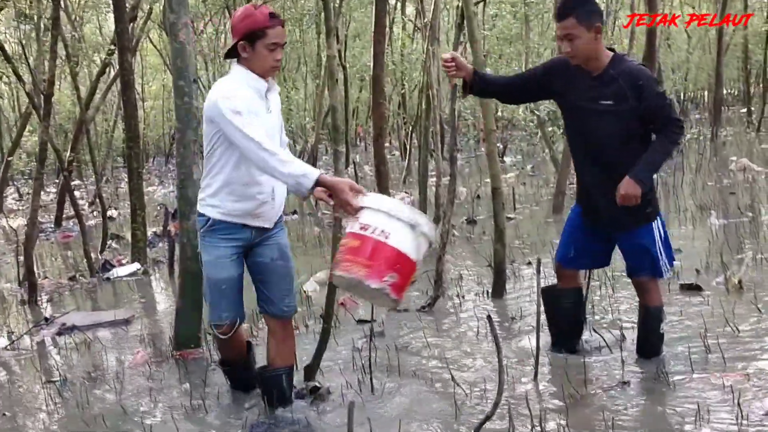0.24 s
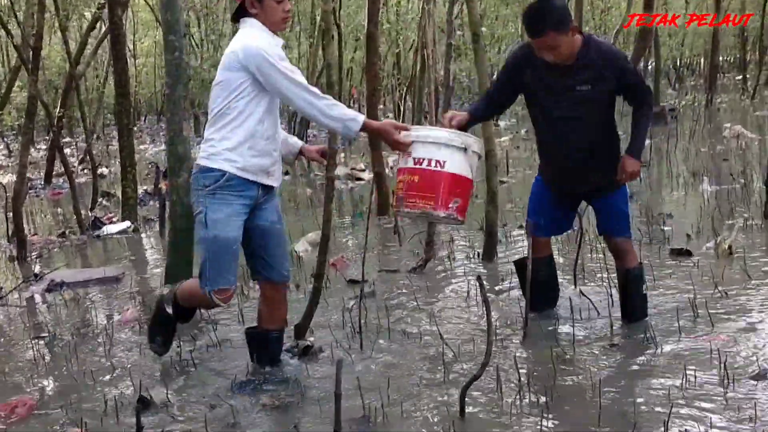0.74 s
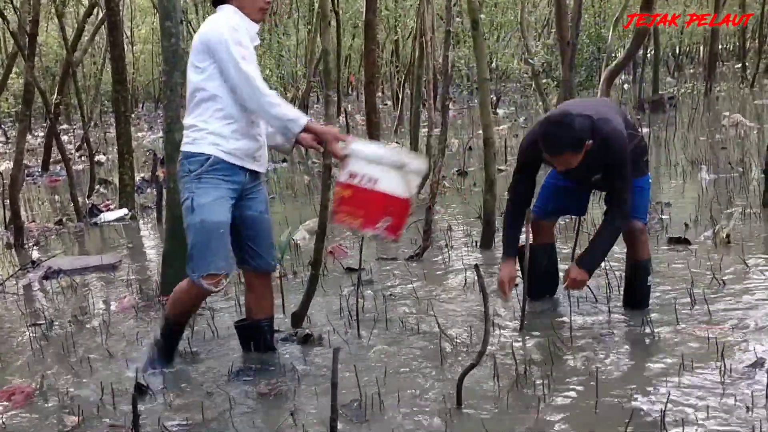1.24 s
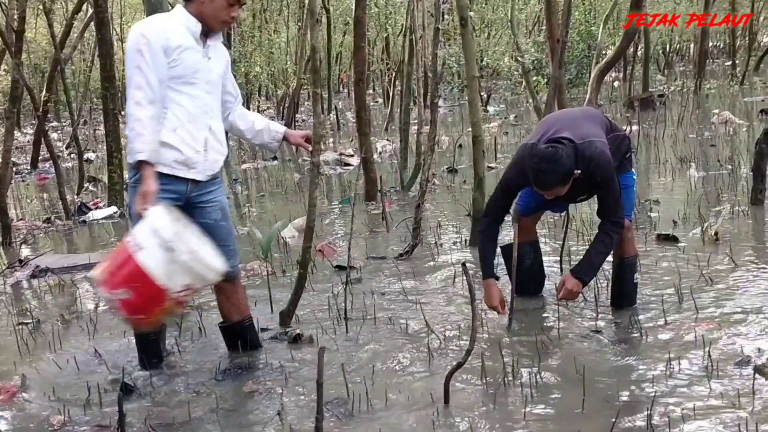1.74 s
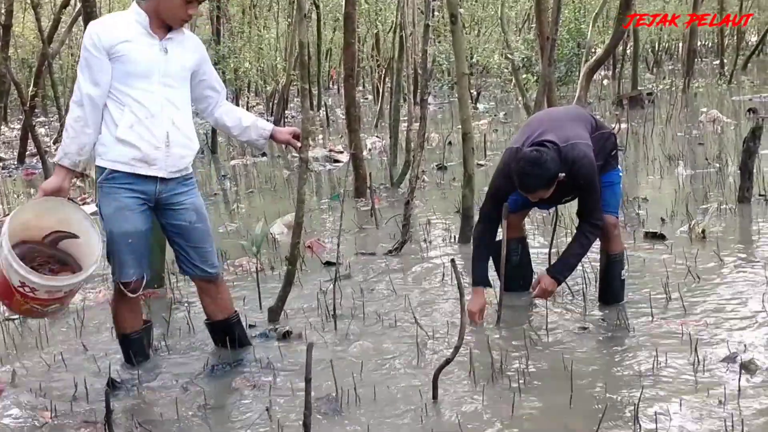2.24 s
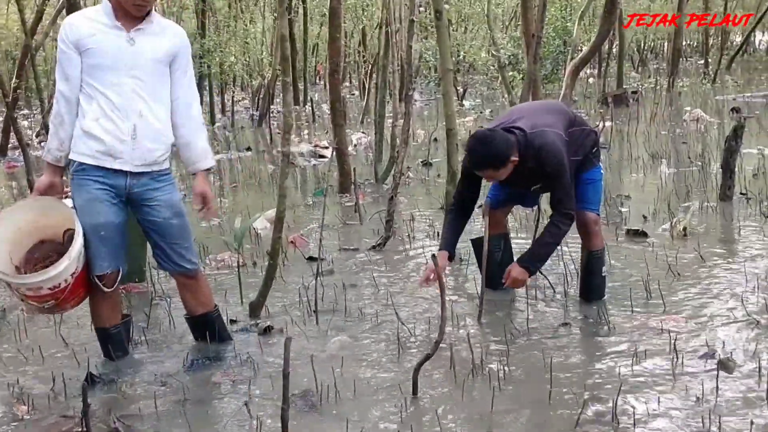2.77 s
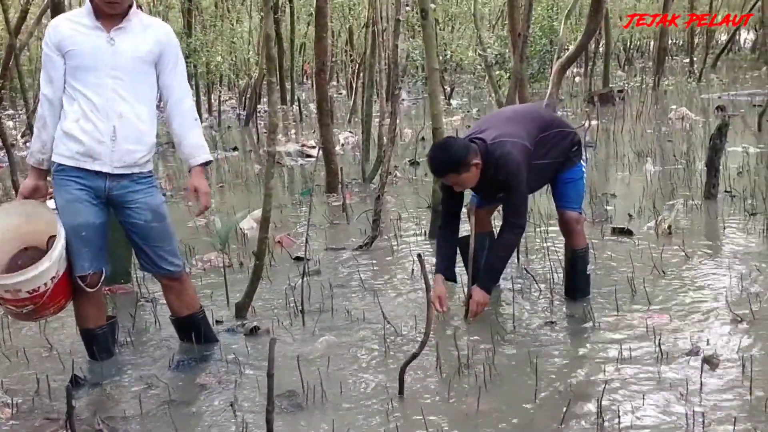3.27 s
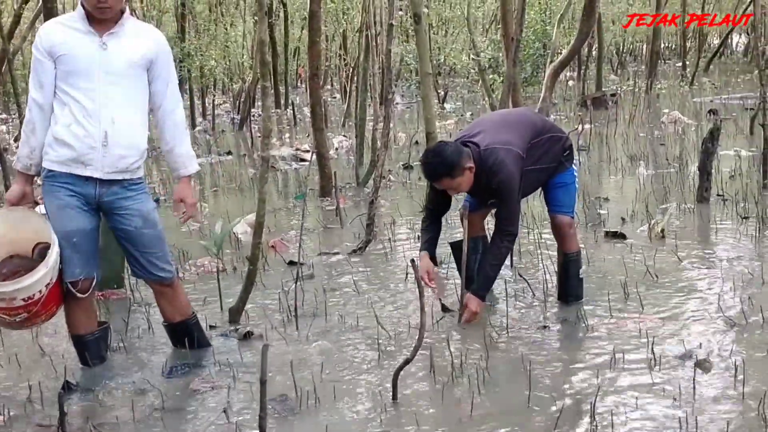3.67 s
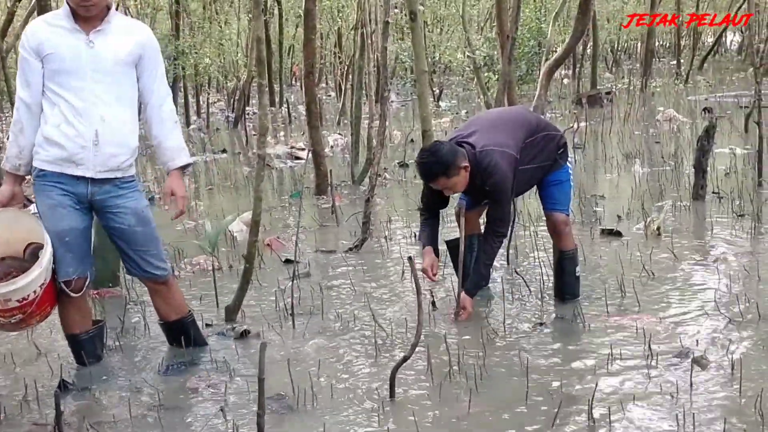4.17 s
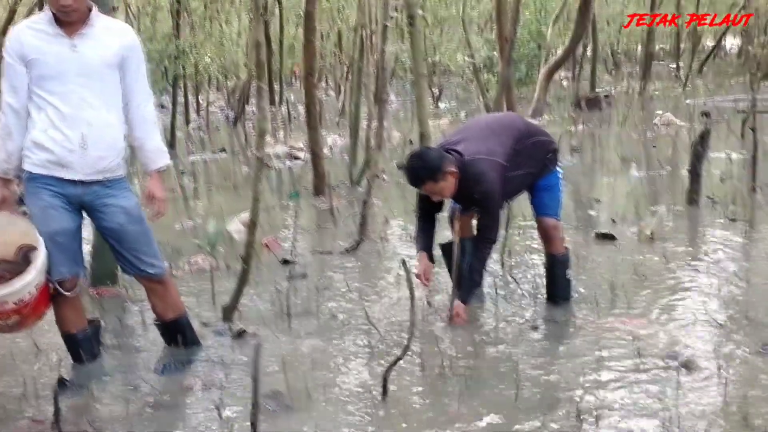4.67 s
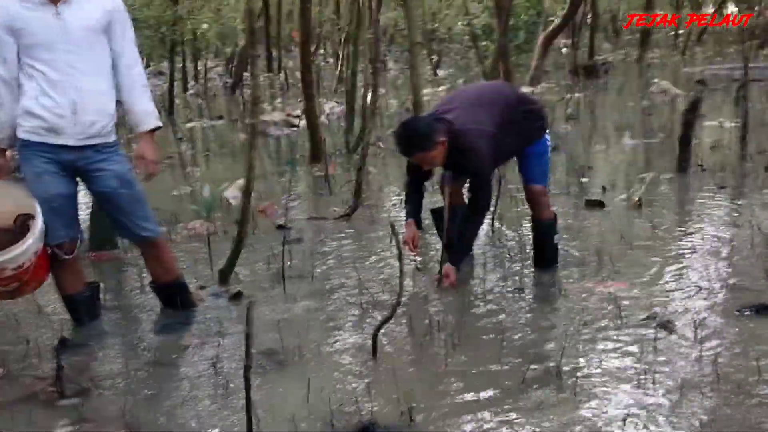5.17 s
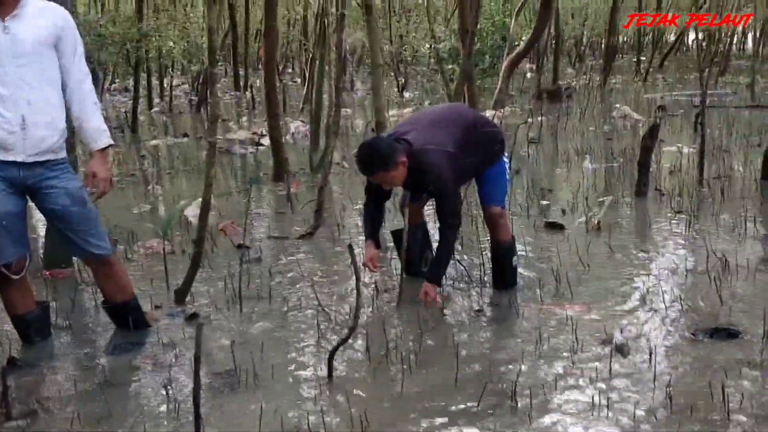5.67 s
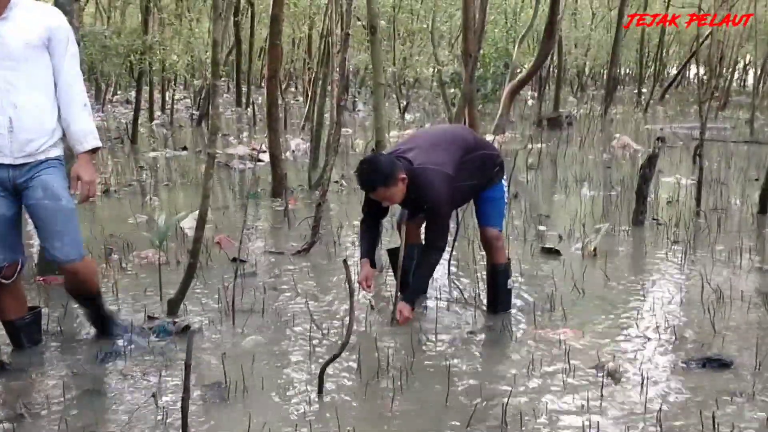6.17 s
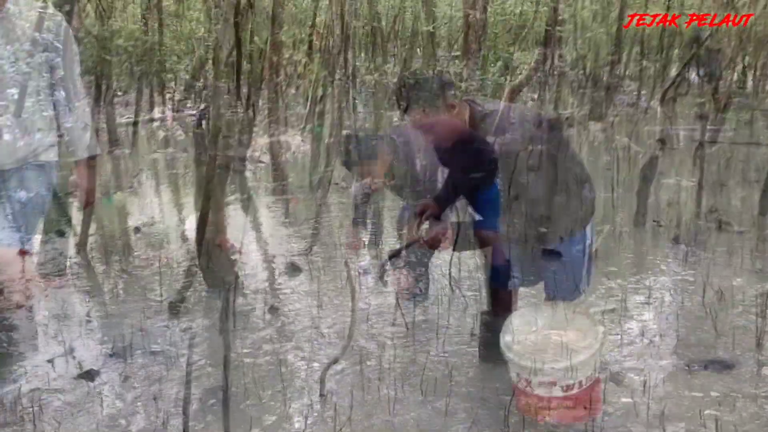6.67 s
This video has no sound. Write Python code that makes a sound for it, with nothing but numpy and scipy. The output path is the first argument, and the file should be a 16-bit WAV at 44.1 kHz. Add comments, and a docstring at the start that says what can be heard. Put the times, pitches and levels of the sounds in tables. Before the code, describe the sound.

Throbbing cicadas and two distant birds fill a mangrove swamp, with nearby splashes, muddy plops and a single bucket handle clack.

```python
"""A small bird repeats a falling, whistled chirp in a mangrove swamp; a second answers with nasal
notes, level and rising. Cicadas buzz with their tymbals and throb over distant insect trills.
Boots slosh in shallow water and hands dabble in mud: ringing bubbles, spray and drips.
A plastic bucket's handle clacks once. Trunks scatter the sound; a low, distant rumble
and the hush of the forest lie underneath."""
import sys
import numpy as np
from scipy import signal
from scipy.fft import rfft, irfft
from scipy.io import wavfile

SR = 44100
rng = np.random.default_rng(int(sys.argv[2]) if len(sys.argv) > 2 else 0)


def int16_out(signal):
    """Quantize to a 16-bit WAV file."""
    q = np.round(np.clip(np.atleast_2d(signal).T, -1, 1) * 32767)
    wavfile.write(sys.argv[1], SR, q.astype(np.int16))


N = 305172
TIME = np.arange(N) / SR


# Shape of one chirp: progress (0-1), pitch_ratio, gain_db
CHIRP_SHAPE = [(0, 1, -3), (.15, .985, 0), (.45, .945, -1), (.65, .89, -4), (.85, .805, -4.5),
               (1, .74, -11)]
# Falling chirps: start_s, length_s, pitch_hz, level_db
FALLING_CHIRPS = [(.242, .085, 3170, -51), (.452, 0.084, 3360, -50.5), (.715, .08, 3360, -51),
                  (.948, 0.097, 3346, -49.5), (1.22, 0.11, 3295, -50), (1.485, .13, 3250, -50),
                  (1.862, 0.093, 3286, -54.5), (2.168, 0.081, 3296, -56.5), (2.485, .1, 3270, -55),
                  (2.788, 0.08, 3240, -57), (3.09, 0.082, 3254, -55.5), (3.248, 0.069, 3200, -52),
                  (3.46, 0.083, 3354, -51), (3.698, 0.097, 3354, -50), (3.96, .098, 3285, -50),
                  (4.255, 0.087, 3220, -49), (4.52, 0.12, 3200, -49.5), (4.94, 0.083, 2654, -57),
                  (5.245, 0.076, 2640, -54.5), (5.555, 0.077, 2583, -58), (6.65, 0.085, 3166, -58)]

def chirp(length_s, pitch_hz, level_db, waver=.0115, rasp=.017, under_db=-11, break_db=4.5):
    """A whistle sags, plunges and breaks up; the other side of the syrinx adds a fainter, lower tone."""
    n = int(length_s * SR)
    progress = np.linspace(0, 1, n) ** 1.3  # delays the fall
    knots, pitch_ratio, gain_db = np.transpose(CHIRP_SHAPE)
    jitter = 1 + waver * wander(n, 80) + rasp * progress * wander(n, 300)
    track_hz = pitch_hz * np.interp(progress, knots, pitch_ratio) * jitter
    phase = 2 * np.pi * np.cumsum(track_hz) / SR
    tone = np.sin(phase) + amp(under_db) * np.sin(.78 * phase) + amp(-25) * np.sin(2 * phase)
    hoarse = amp(-4) * progress * band(rng.standard_normal(n), 2350, 760)
    flicker_db = break_db * np.sqrt(progress) * wander(n, 74)
    effort_db = level_db + np.interp(progress, knots, gain_db) + flicker_db
    return amp(effort_db) * (unit(tone) + hoarse) * signal.windows.tukey(n, .16)


# Second bird's hoarseness: freq_hz, gain_db
RASP_SPECTRUM = [(900, -41), (1500, -7.5), (2100, -3.5), (2700, -6), (3400, -2.5), (4000, -19),
                 (4450, -1.5), (5200, -25.5)]

def nasal_note(length_s, pitch_hz, glide, rough, level_db, jitter=.0586):
    """Glides up toward pitch_hz, second harmonic strongest; rough (0-1) adds jitter and rasp."""
    n = int(length_s * SR)
    slide = 1 - glide * np.exp(-np.linspace(0, 1, n) / .25)
    track_hz = pitch_hz * slide * (1 + jitter * rough * wander(n, 293))
    phase = 2 * np.pi * np.cumsum(track_hz) / SR
    tone = amp(-5) * np.sin(phase) + np.sin(2 * phase) + amp(-15) * np.sin(3 * phase)
    rasp = amp(1) * 2 * rough ** 2 * colour(rng.standard_normal(n), RASP_SPECTRUM)
    return amp(level_db) * unit(unit(tone) + rasp) * signal.windows.tukey(n, .45)


# Second bird's level notes: start_s, pitch_hz, level_db
LEVEL_CALLS = [(.07, 1745, -57), (.29, 1755, -59), (.52, 1705, -56), (.8, 1745, -58), (1.06, 1720, -54.5),
               (1.65, 1718, -57.5), (2.19, 1683, -61), (2.79, 1660, -54.5), (3.41, 1676, -53.5),
               (3.71, 1648, -58), (4.05, 1664, -55), (4.73, 1675, -56.5), (4.91, 1654, -58),
               (5.405, 1677, -56), (6.11, 1658, -59)]

def level_note(pitch_hz, level_db):
    """A short, fairly clean note of nearly steady pitch."""
    return nasal_note(length_s=.11, pitch_hz=pitch_hz, glide=.01, rough=.26, level_db=level_db)


# Second bird's rising notes: start_s, level_db
RISING_CALLS = [(1.34, -53.5), (1.92, -62), (2.53, -55), (3.14, -54), (3.79, -55), (4.47, -54),
                (5.175, -52.5), (5.865, -55), (6.5, -59)]

def rising_note(level_db, usual_db=-55, usual_rough=.723, rough_per_db=.2):
    """A longer note that slides up; the harder the call, the hoarser."""
    rough = np.clip(usual_rough + rough_per_db * (level_db - usual_db), 0, 1)
    return nasal_note(length_s=.155, pitch_hz=1866, glide=.1, rough=rough, level_db=level_db)


# Cicada buzz: freq_hz, gain_db
CICADA_SPECTRUM = [(3700, -22), (4250, -0.5), (4850, -0.5), (5300, 3), (5620, 2.5), (6050, -0.5),
                   (6700, -1.5), (7100, -3), (8900, -5), (10300, -0.5), (11400, -3), (12200, -19),
                   (13700, -13), (15400, 2)]
# Cicada loudness: time_s, level_db
CICADA_ENVELOPE = [(0, -47.5), (2.2, -48.5), (4.8, -49), (5.2, -48), (5.6, -49.4), (6.3, -49.5),
                   (6.65, -52), (6.92, -56)]

def cicadas(stroke_hz=102.2, echo_db=-5):
    """Each tymbal stroke buckles three ribs; the buzz glances off trunks and blurs into the chorus."""
    strokes = np.cumsum(stroke_hz * (1 + .003 * wander(N, 9) + .02 * wander(N, 150))) / SR
    clicks = np.zeros(N)
    for rib_lag, strength in [(0, 1), (.38, .8), (.66, .6)]:
        buckles = np.flatnonzero(np.diff(np.floor(strokes - rib_lag)))
        clicks[buckles] += strength * (1 + .15 * rng.standard_normal(len(buckles)))
    buzz = unit(forest(clicks - clicks.mean(), wet_db=1)) + amp(-.5) * rng.standard_normal(N)
    delays_s = rng.uniform(.003, .02, size=8)
    echoes = sum(rng.choice([-1, 1]) * np.roll(buzz, int(delay_s * SR)) for delay_s in delays_s)
    chorus = colour(buzz + amp(echo_db) * unit(echoes), CICADA_SPECTRUM)
    return amp(curve(CICADA_ENVELOPE)) * throb(depth_db=2.5) * chorus


def throb(depth_db, rate_hz=6.883, first_peak_s=.019):
    """The cicadas' abdomens pump the level up and down."""
    angle = 2 * np.pi * rate_hz * (TIME - first_peak_s)
    return unit(amp(depth_db * (np.cos(angle) - .15 * np.cos(2 * angle))))


# Insect trills: centre_hz, width_hz, level_db
TRILL_BANDS = [(4811, 31, -73), (5620, 30, -65.5), (5610, 290, -60), (6560, 100, -62), (6788, 61, -64.5)]
# Trill fade: time_s, gain_db
TRILL_ENVELOPE = [(0, 0), (5.6, 0.2), (6.92, -4.5)]

def trills(waver_db=1):
    """Distant insects merge into narrow bands that waver and pulse with the cicadas."""
    chorus = sum(amp(level_db + waver_db * wander(N, 3.7)) * band(rng.standard_normal(N), hz, width_hz)
                 for hz, width_hz, level_db in TRILL_BANDS)
    return amp(curve(TRILL_ENVELOPE)) * throb(depth_db=.5) * chorus


# Boots entering water: start_s, slap_db, slap_hz, churn_db, spray_db
BOOT_STEPS = [(1.413, -33.5, 650, -51, -48), (1.589, -30, 1420, -39, -48), (6.407, -48, 750, -48.5, -56),
              (6.715, -48, 1400, -48, -59)]

def boot_step(slap_db, slap_hz, churn_db, spray_db, plunge_s=.013):
    """A boot breaks the surface, churning water and throwing spray; then its sole slaps down."""
    out = np.zeros(SR // 2)
    add(out, 0, splash(churn_db, 1600, width_oct=1.2, decay_s=.03, ring_share=.039))
    add(out, 0, splash(spray_db, 9000, width_oct=2, decay_s=.069, ring_share=0))
    add(out, plunge_s, splash(slap_db, slap_hz, width_oct=1.1, decay_s=.0036, ring_share=.2))
    return out


# Air trapped in mud: start_s, level_db, pitch_hz, decay_s
MUD_PLOPS = [(.15, -41, 1350, .009), (.226, -47, 2200, .015), (.32, -40, 740, .0063),
             (1.34, -45.5, 1044, .01), (1.5252, -28.5, 1930, 0.0032), (1.594, -39, 1027, 0.011),
             (1.639, -36.5, 2390, 0.0075), (2.06, -53.5, 453, 0.028), (2.683, -42, 1080, .0063),
             (3.2, -51, 2100, .02), (6.257, -48, 793, .008), (6.292, -40, 703, 0.0064),
             (6.294, -45.5, 2750, 0.0053), (6.425, -48, 736, .01), (6.513, -47.5, 1385, .012),
             (6.578, -46.5, 1144, .008), (6.679, -46.5, 1570, .012), (6.703, -44.5, 1345, 0.011),
             (6.727, -45, 754, 0.021), (6.797, -46, 1430, .01), (6.843, -44, 2780, .004)]

def plop(level_db, pitch_hz, decay_s):
    """An air pocket bursts: mostly bubble, some spray."""
    return splash(level_db, pitch_hz, width_oct=.34, decay_s=decay_s, ring_share=.62)


# Droplets: start_s, level_db
DROPLETS = [(.158, -36), (.341, -41), (1.339, -42), (2.282, -38), (2.39, -48), (4.678, -50)]

def drip(level_db):
    """A droplet hits the surface: a bright tick with no ring."""
    return splash(level_db, 11500, width_oct=.56, decay_s=.0027, ring_share=0)


def splash(level_db, centre_hz, width_oct, decay_s, ring_share, attack_s=.0008):
    """A puff of spray with a bubble in it."""
    t = np.arange(int((6 * decay_s + .01) * SR)) / SR
    bell = [(centre_hz * 2 ** (k * width_oct), gain_db)
            for k, gain_db in [(-2, -30), (-1, -7), (0, 0), (1, -7), (2, -35)]]
    spray = np.sqrt(1 - ring_share) * colour(rng.standard_normal(len(t)), bell) * np.exp(-t / decay_s)
    ring = np.sqrt(2 * ring_share) * bubble(t, centre_hz, decay_s, rise=.03)
    return amp(level_db) * (spray + ring) * (1 - np.exp(-t / attack_s))


def bubble(t, pitch_hz, decay_s, rise=.063):
    """A trapped bubble rings and rises in pitch."""
    return np.sin(2 * np.pi * pitch_hz * (t + rise * t ** 2 / (2 * decay_s))) * np.exp(-t / decay_s)


# Stirring of the water: time_s, level_db
SLOSH_ENVELOPE = [(0, -47), (.17, -48.5), (.35, -49.5), (.45, -56), (.62, -52), (.85, -57.5), (1.25, -62.5),
                  (1.58, -50.5), (1.75, -57), (2.65, -57), (3.5, -58.5), (5.25, -62.5), (5.5, -76),
                  (6.1, -60.5), (6.75, -57.5)]
# Stirred water: freq_hz, gain_db
SLOSH_SPECTRUM = [(250, -26), (450, -4.5), (800, 0), (1400, 1), (2400, -4.5), (4000, -8), (8000, -12),
                  (15000, -16)]

def sloshing(per_s_at_1khz=45, spread_db=3, decay_cycles=4):
    """Stirred water rings with swarms of bubbles, the small ones most often."""
    t = np.arange(SR // 12) / SR
    swarm = np.zeros(N)
    for hz in np.geomspace(400, 14000, 36):
        strengths = amp(spread_db * np.minimum(rng.exponential(1, N), 4))
        births = rng.random(N) < per_s_at_1khz * np.sqrt(hz / 1000) / SR
        ringing = signal.oaconvolve(strengths * births, bubble(t, hz, decay_cycles / hz))[:N]
        swarm += np.sqrt(hz) * unit(ringing)
    return amp(curve(SLOSH_ENVELOPE)) * colour(swarm, SLOSH_SPECTRUM)


# Bucket wall modes: freq_hz, gain_db, t60_s
BUCKET_MODES = [(1034, 1.5, 0.049), (1543, -3, .06), (1677, -1, 0.078), (2010, 4, .05), (2150, 8, 0.05),
                (2580, 8, 0.025), (2800, 1, 0.029), (3167, -5, 0.047), (3400, 0, 0.037), (3550, 4, 0.047),
                (3679, -4, .04), (5800, 0, 0.031), (6413, -18, 0.02)]

def bucket(start_s=.7046, ring_db=-22.5, crack_db=-24.5, rattle_db=-40,
           bounce_s=.0016, crack_decay_s=.00083, rattle_decay_s=.033):
    """The handle snaps against the plastic wall, bounces once and rattles out."""
    t = np.arange(SR // 4) / SR
    ring = sum(amp(gain_db - 60 * t / t60_s) * np.sin(2 * np.pi * (hz * t + rng.random()))
               for hz, gain_db, t60_s in BUCKET_MODES)
    crack = colour(rng.standard_normal(len(t)),
                   [(600, -23.5), (1800, -3), (6000, -2), (8000, -17), (12000, -1), (15000, -9.5)])
    rattle = colour(rng.standard_normal(len(t)),
                    [(600, -25), (1000, -10), (2400, 8), (4500, -3), (9000, -2), (14000, -18.5)])
    bounce = .8 * (t > bounce_s) * np.exp(-abs(t - bounce_s) / crack_decay_s)
    out = np.zeros(N)
    add(out, start_s, amp(ring_db) * ring / abs(ring).max())
    add(out, start_s, amp(crack_db) * crack * (np.exp(-t / crack_decay_s) + bounce))
    add(out, start_s, amp(rattle_db) * rattle * np.exp(-t / rattle_decay_s))
    return out


# Distant rumble: freq_hz, gain_db
RUMBLE_SPECTRUM = [(11, -12.5), (18, -1.5), (32, -20.5), (65, 3), (101, -4.5), (130, -1.5), (160, -6.5),
                   (196, -6), (298, -20), (420, -30.5), (550, -60.5), (920, -120)]
# Rumble loudness: time_s, level_db
RUMBLE_ENVELOPE = [(0, -44), (1.5, -45.5), (2.4, -44.5), (3.45, -44.3), (4.25, -45.5), (5.1, -44),
                   (6.36, -44.5), (6.67, -48.5), (6.92, -47.5)]

def rumble():
    """Low noise from far away."""
    return colour(rng.standard_normal(N), RUMBLE_SPECTRUM) * amp(curve(RUMBLE_ENVELOPE))


# Forest hush: freq_hz, gain_db
HUSH_SPECTRUM = [(200, 3.5), (400, -1.5), (1050, -0.5), (1400, -1), (2300, -2), (3100, -4.5), (3550, -10.5),
                 (6000, -22.5), (12500, -15.5), (16000, -6)]
# Hush loudness: time_s, level_db
HUSH_ENVELOPE = [(0, -50.5), (1.8, -52.5), (3, -53.5), (5.3, -53), (5.8, -54.5), (6.92, -55.5)]

def hush(flutter_db=1.5):
    """Soft, broad forest noise whose level flutters."""
    noise = colour(rng.standard_normal(N), HUSH_SPECTRUM)
    return noise * amp(curve(HUSH_ENVELOPE) + flutter_db * wander(N, 20))


# Echo among the trunks: freq_hz, t60_s
TRUNK_DECAY = [(300, 0.43), (1500, 0.43), (2600, 0.57), (3200, 1), (7000, 0.29), (15000, 0.29)]

def forest(x, wet_db, echoes_per_s=2000, build_s=.02):
    """Direct sound plus scatter from the trunks; three tails crossfade as the paths slowly shift."""
    out = x.copy()
    for k in range(3):
        taps = rng.standard_normal(SR) * (rng.random(SR) < echoes_per_s / SR)
        hz, t, spectra = signal.stft(taps, SR, nperseg=256)
        spectra *= amp(-60 * t / at_hz(TRUNK_DECAY, hz)[:, None])
        tail = signal.istft(spectra * (1 - np.exp(-t / build_s)), SR, nperseg=256)[1]
        share = np.sqrt(2 / 3) * np.cos(np.pi * (TIME / 2 + k / 3))
        out += amp(wet_db) * signal.fftconvolve(x * share, tail / np.linalg.norm(tail))[:N]
    return out


def amp(db):
    """Decibels to gain."""
    return 10 ** (np.asarray(db) / 20)


def unit(x):
    """Scales to rms 1."""
    return x / np.sqrt(np.mean(x ** 2) + 1e-20)


def curve(rows):
    """Joins (time_s, value) rows by straight lines."""
    return np.interp(TIME, *np.transpose(rows))


def at_hz(rows, hz):
    """Reads (freq_hz, value) rows on a log-frequency axis."""
    freq_hz, value = np.transpose(rows)
    return np.interp(np.log(hz + 1), np.log(freq_hz), value)


def colour(x, spectrum):
    """Filters by (freq_hz, gain_db) rows; rms 1."""
    gain = amp(at_hz(spectrum, np.fft.rfftfreq(len(x), 1 / SR)))
    return unit(irfft(rfft(x) * gain, len(x)))


def band(x, centre_hz, width_hz):
    """Gaussian band-pass; rms 1."""
    freq_hz = np.fft.rfftfreq(len(x), 1 / SR)
    return unit(irfft(rfft(x) * np.exp(-((freq_hz - centre_hz) / width_hz) ** 2), len(x)))


def wander(n, rate_hz):
    """Smooth random drift; rms about 1."""
    return band(rng.standard_normal(n + SR // 4), 0, rate_hz)[:n]


def add(mix, start_s, sound):
    """Lays a sound into the mix."""
    part = mix[max(round(start_s * SR), 0):][:len(sound)]
    part += sound[:len(part)]


def play(table, source):
    """One event per row."""
    out = np.zeros(N)
    for start_s, *settings in table:
        add(out, start_s, source(*settings))
    return out


def scene():
    """Birds far among the trunks, water and bucket near; two identical channels."""
    answers = play(LEVEL_CALLS, level_note) + play(RISING_CALLS, rising_note)
    birds = forest(play(FALLING_CHIRPS, chirp), wet_db=-4) + forest(answers, wet_db=-5.5)
    water = play(BOOT_STEPS, boot_step) + play(MUD_PLOPS, plop) + play(DROPLETS, drip)
    near = forest(water, wet_db=-9) + forest(bucket(), wet_db=-11.5) + sloshing()
    return np.tile(birds + near + cicadas() + trills() + rumble() + hush(), (2, 1))


def record(dry, cutoff_hz=15520):
    """Steep low-pass on the top treble."""
    lowpass = signal.firwin(1023, cutoff_hz, window=("kaiser", 8), fs=SR)
    return signal.oaconvolve(dry, lowpass[None], "same")


dry = scene()
out = record(dry)
int16_out(out)
```